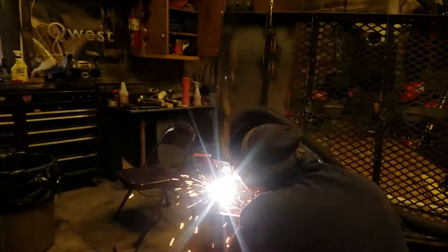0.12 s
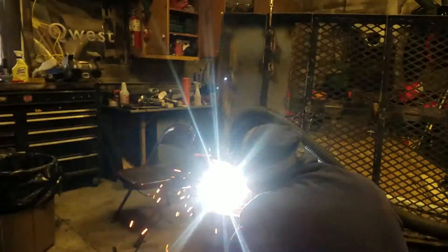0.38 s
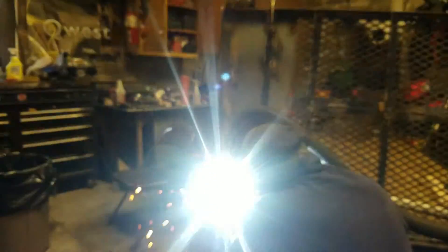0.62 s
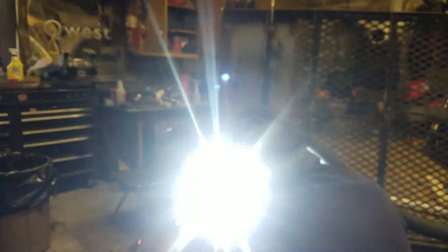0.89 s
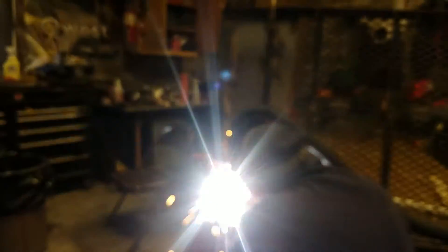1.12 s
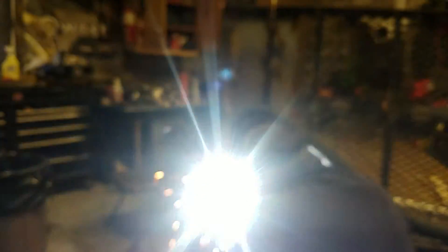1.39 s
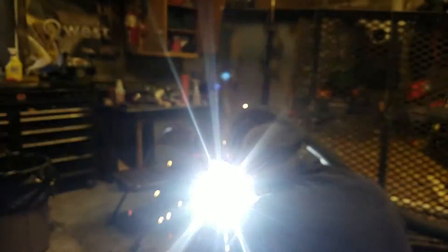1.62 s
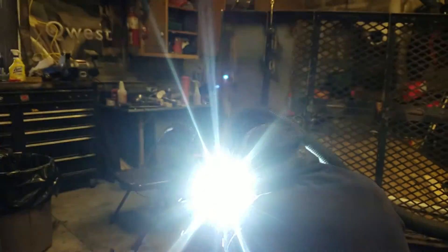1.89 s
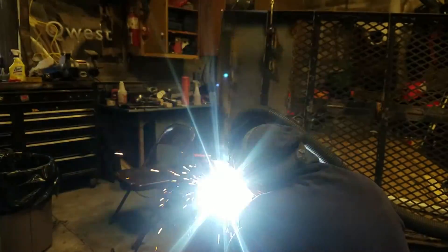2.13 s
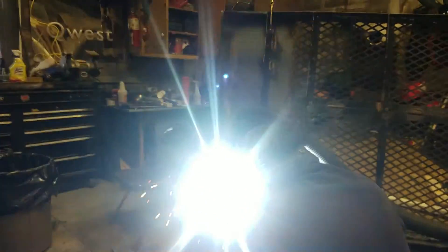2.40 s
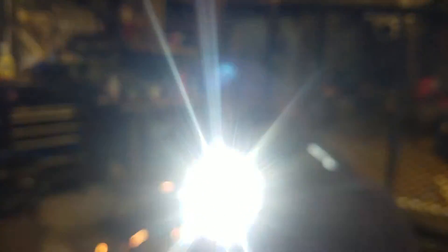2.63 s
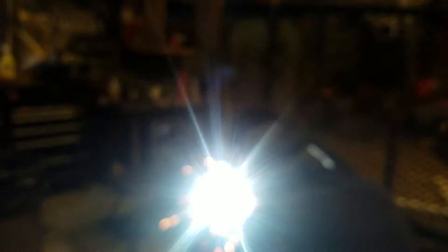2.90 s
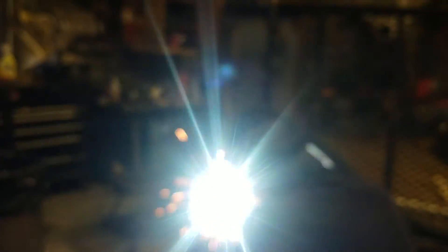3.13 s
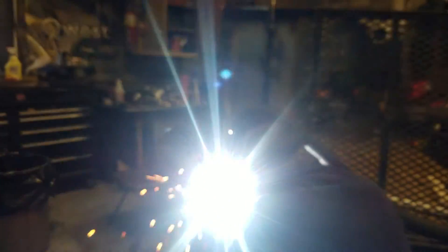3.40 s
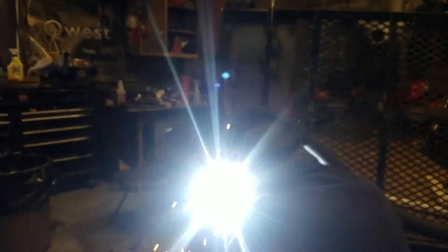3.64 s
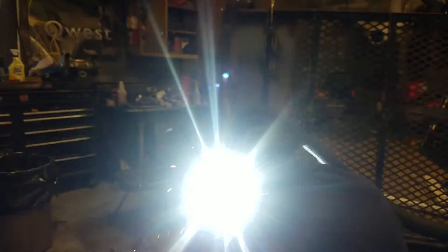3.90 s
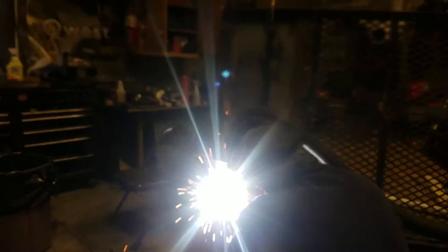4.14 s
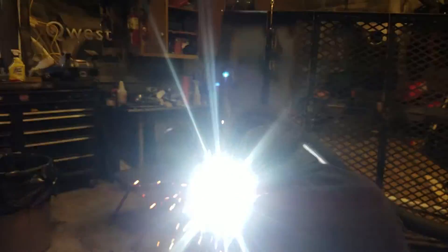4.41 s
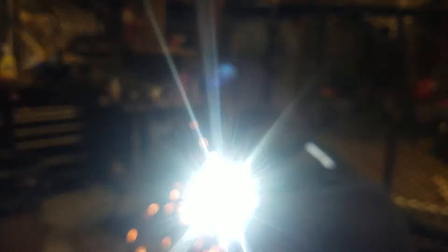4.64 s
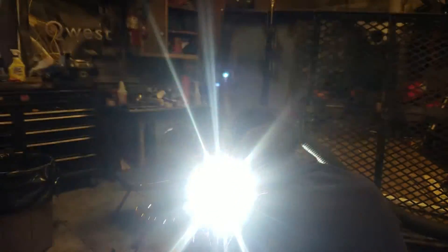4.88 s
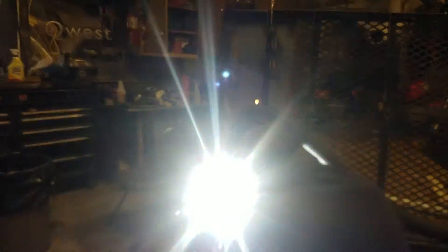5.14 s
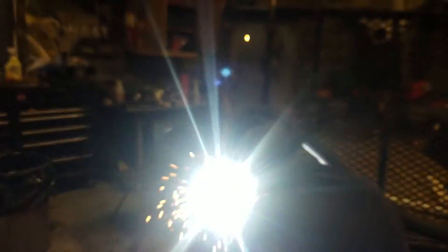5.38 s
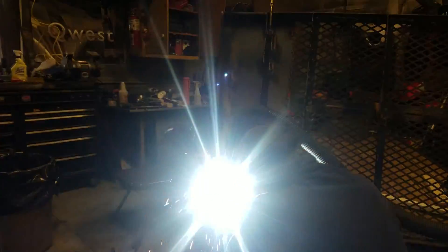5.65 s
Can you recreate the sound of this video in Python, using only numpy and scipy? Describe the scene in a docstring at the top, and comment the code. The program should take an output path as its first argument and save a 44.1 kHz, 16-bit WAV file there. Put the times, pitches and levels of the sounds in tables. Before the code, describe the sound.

A steady vacuum hum-whine, heavier in the right channel, runs from start to end under turbulent air noise. Over it a welding arc spits and hisses, bright and grainy, stuttering for split seconds again and again. The small hard room blurs the noise; a close stereo phone microphone evens the loudness. Late on, suction noise and the upper octave of the whine rise slightly.

```python
"""From the start a shop vacuum whines in a closed garage and a stick welding arc sizzles near a phone.
The rotor is a stack of wavering sines on shaft orders, the rush coloured noise, the arc dense noise bursts.
From 0.6 s on, short circuits dip the arc again and again; its lower hiss swells throughout.
The hose draw creeps up until 2.7 s, eases a little, then rises from 4.1 s to its most at 4.8 s:
rush and octave follow it, the shaft slows. Two ports colour the sound; gain control evens the level."""
import sys
import numpy as np
from scipy import signal
from scipy.fft import rfft, irfft
from scipy.io import wavfile
from scipy.ndimage import uniform_filter1d

SR = 44100
rng = np.random.default_rng(int(sys.argv[2]) if len(sys.argv) > 2 else 0)


def gain_from_db(level_db):
    """Convert decibel levels to linear amplitude factors (20 dB per decade)."""
    decades = np.asarray(level_db, float) / 20
    return 10 ** decades


def digitize_waveform(pressure):
    """Quantize a signal to 16-bit integers and store it at the path in sys.argv[1].

    Rows of a 2-D input are taken as channels; values are limited to [-1, 1].
    """
    field = np.atleast_2d(pressure).T
    bounded = np.clip(field, -1, 1)
    quanta = np.round(bounded * 32767).astype(np.int16)
    wavfile.write(sys.argv[1], SR, quanta)


N = 254456
T = np.arange(N) / SR


def walk(rate_hz):
    """Slow random drift: levels held 1 / rate_hz s, slewed by two moving means; standard deviation 1."""
    hold = int(SR / rate_hz)
    held = np.repeat(rng.standard_normal(N // hold + 1), hold)
    drift = uniform_filter1d(uniform_filter1d(held, hold), hold)[:N]
    return drift / drift.std()


# Draw of the hose, also played by air(). Each row: time in seconds, lift of the rush in dB.
HOSE_DRAW = [(0, 0), (2.7, 0.7), (4.1, .5), (4.8, 1.5), (5.77, 1.3)]
# Rotor tones. Each row: shaft order, mains ripples added, left rms level in dB, right rms level in dB,
# left's phase lead in radians.
ROTOR_TONES = [(1, 0, -21, -15.4, -.2), (2, 0, -26.9, -28.5, 1.9), (3, 0, -37, -33.2, -1.2),
               (4, 0, -42.3, -33.5, -1.8), (5, 0, -36.4, -56, .6), (6, 0, -45, -50.5, -.2),
               (8, 0, -51, -57, .1), (1, -1, -50, -44.5, -.1), (1, 1, -55, -48, .1), (2, 1, -52, -48.5, .3)]


def rotor():
    """Shaft orders waver in the air stream; load slows the shaft, mains torque ripple adds side tones."""
    shaft_hz, sag_hz_per_db, wander_hz = 335.8, .2, .05
    ripple_hz, octave_db_per_db = 120, 2.0
    gust_db = .75 * walk(22)
    draw_db = np.interp(T, *np.transpose(HOSE_DRAW))
    speed_hz = shaft_hz - sag_hz_per_db * draw_db + wander_hz * walk(2.055)
    turn = 2 * np.pi * np.cumsum(speed_hz) / SR
    out = np.zeros((2, N))
    for order, ripples, left_db, right_db, lead_rad in ROTOR_TONES:
        spread_rad = .9 * (order - 1) - .5 * (order - 1) ** 2
        # speed ripple: the two side tones stand in opposition
        spread_rad += np.pi * (ripples < 0)
        phase = order * turn + ripples * 2 * np.pi * ripple_hz * T + spread_rad
        waver_db = gust_db + .15 * order * walk(40)
        # side tones come and go
        waver_db = waver_db + 2.5 * abs(ripples) * walk(5)
        # the loaded octave grows faster than the rush
        waver_db = waver_db + (order == 2) * octave_db_per_db * draw_db
        peak = np.sqrt(2) * gain_from_db(waver_db) * gain_from_db([[left_db], [right_db]])
        out += peak * np.cos(phase + np.array([[lead_rad], [-lead_rad]]) / 2)
    return out


def garage(x, t60_s, echo_db, scatter_db):
    """Direct sound, fixed echoes at each port, and a wash from a source that never sits still."""
    t = np.arange(SR // 4) / SR
    fade = 1000. ** (-t / t60_s) * np.clip(t / 0.003 - 1, 0, 1)
    fade /= np.sqrt(np.sum(fade ** 2))
    paths = gain_from_db(echo_db) * fade * rng.standard_normal((2, len(t)))
    paths[:, 0] = 1
    # mirrored lead-in: the room already rings at the start
    lead_in = np.concatenate([x[:len(t)][::-1], x])
    heard = signal.fftconvolve(lead_in[None], paths, axes=1)[:, len(t):len(t) + N]
    # wash: source power through the same decay, unrelated at the two ports
    power = signal.fftconvolve(lead_in ** 2, fade ** 2)[len(t):len(t) + N]
    wash = gain_from_db(scatter_db) * np.sqrt(np.abs(power)) * rng.standard_normal((2, N))
    return (heard + wash) / np.sqrt(1 + gain_from_db(2 * echo_db) + gain_from_db(2 * scatter_db))


# Angled arrival and separate channels. Each row: frequency in Hz, left's phase lead in radians.
PORT_LEAD = [(0, 0), (300, -.2), (1500, 0), (2500, .1), (5000, 1.1), (5900, .4), (6500, 1.1), (8500, .5),
             (9000, -.5), (10300, -.7), (11000, 0), (13000, .5), (14500, 1.2), (16000, 1.8)]


def colour(x, gains, peaks):
    """Each port has its own gain curve and resonances; both share one minimum phase, offset by PORT_LEAD."""
    size = 8192
    hz = np.maximum(np.arange(size // 2 + 1) * SR / size, 1)
    gains = np.array(gains)
    db = np.array([np.interp(np.log(hz), np.log(gains[:, 0]), gains[:, c]) for c in (1, 2)])
    for centre_hz, width_hz, left_db, right_db in peaks:
        bell = 1 / (1 + (2 * (hz - centre_hz) / width_hz) ** 2)
        db += np.array([[left_db], [right_db]]) * bell
    # folded cepstrum yields the minimum phase
    cepstrum = irfft(np.log(gain_from_db(db.mean(0))))
    cepstrum[1:size // 2] *= 2
    cepstrum[size // 2 + 1:] = 0
    lead_rad = np.interp(hz, *np.transpose(PORT_LEAD))
    phase = rfft(cepstrum).imag + lead_rad * np.array([[.5], [-.5]])
    # rolled to hold what leads, then trimmed by as much
    advance = size // 8
    response = np.roll(irfft(gain_from_db(db) * np.exp(1j * phase)), advance, axis=1)
    return signal.fftconvolve(x, response, axes=1)[:, advance:advance + N]


# Rushing air at the ports. Each row: frequency in Hz, left gain in dB, right gain in dB.
AIR_COLOUR = [(30, -69, -72), (77, -72.5, -71.5), (109, -78, -75), (145, -69, -64.5), (257, -65.5, -62),
              (470, -66, -59.5), (820, -67.5, -67), (1200, -70, -71), (2300, -69, -68.5), (4700, -69, -66),
              (6400, -72, -68.5), (8700, -81.5, -99), (16100, -82, -72)]
# Garage resonances. Each row: centre in Hz, width in Hz, left boost in dB, right boost in dB.
GARAGE_PEAKS = [(335, 90, 6, 6), (640, 110, 4, 2), (890, 50, 2, 4), (1110, 70, 8, 2), (1290, 50, 4, 2),
                (1530, 150, 5, 2), (2140, 80, 6, 4)]
# Cavities around the ports; air() plays the first, arc() all.
# Each row: centre in Hz, width in Hz, left boost in dB, right boost in dB.
PORT_CAVITIES = [(3030, 120, 4, 3), (5520, 240, 8, 1), (5810, 170, 14, 1), (6150, 90, 5, 1),
                 (6850, 330, 9, 2), (10170, 290, 4, 1), (10850, 190, 2, 1.5), (13700, 240, .6, 3),
                 (14180, 190, .6, 3), (14650, 190, .6, 3)]


def air():
    """Turbulent rush: long bass waves are alike at both ports, the room scatters the rest."""
    split_hz = 420
    draw_db = np.interp(T, *np.transpose(HOSE_DRAW))
    # sqrt(SR / 2): unit noise power per Hz
    flow = gain_from_db(draw_db + 0.89 * walk(30)) * np.sqrt(SR / 2)
    bass = signal.lfilter(*signal.butter(2, split_hz, fs=SR), flow * rng.standard_normal(N))
    far = garage(flow * rng.standard_normal(N), t60_s=0.21, echo_db=14.0, scatter_db=6.0)
    far = signal.lfilter(*signal.butter(2, split_hz, "high", fs=SR), far)
    stray = .18 * flow * rng.standard_normal((2, N))
    # the exhaust housing breathes one broad note straight at both ports
    housing = signal.lfilter(*signal.iirpeak(2450, 9.0, fs=SR), flow * rng.standard_normal(N))
    rush = far + stray + 0.83 * bass + gain_from_db(1.0) * housing
    return colour(rush, AIR_COLOUR, GARAGE_PEAKS + PORT_CAVITIES[:1])


def sparks(rate_hz, spread_db, burst_s):
    """Noise bursts decay from random moments, a few far stronger than the rest; rms 1."""
    size_db = np.minimum(spread_db * rng.exponential(size=N), 13)
    starts = (rng.random(N) < rate_hz / SR) * gain_from_db(2 * size_db)
    power = signal.lfilter([1], [1, -np.exp(-1 / (burst_s * SR))], starts)
    x = np.sqrt(power) * rng.standard_normal(N)
    return x / x.std()


# Short circuits. Each row: centre in seconds, width at half depth in seconds, dip of the sizzle in dB.
SHORT_CIRCUITS = [(.645, 0.016, 6), (1.06, 0.031, 4.5), (1.122, 0.018, 1), (1.53, 0.061, 4.5),
                  (1.567, 0.027, 12), (1.672, 0.045, 11), (2.008, .04, 5), (2.642, 0.027, 4),
                  (2.682, 0.011, 6), (3.617, 0.042, 7.5), (3.676, 0.022, 11), (4.212, 0.038, 0.5),
                  (4.432, 0.11, 8.5), (4.817, 0.025, 12), (4.86, 0.071, 5.5), (5.243, .025, 9),
                  (5.573, 0.021, 10)]
# Bright sizzle. Each row: time in seconds, relative level in dB.
SIZZLE_LEVEL = [(0, -25.5), (4.5, -25.5), (4.72, -23.5), (5.0, -25.5), (5.77, -27)]
# Lower hiss. Each row: time in seconds, relative level in dB.
HISS_LEVEL = [(0, -26.5), (.25, -23.5), (.65, -27), (.9, -24.5), (1.17, -27), (1.43, -21), (1.68, -26),
              (2.02, -25), (2.25, -23.5), (2.5, -23), (2.9, -28.5), (3.36, -23.5), (3.7, -25.5),
              (4.1, -24.5), (4.3, -23.5), (4.72, -23.5), (5.12, -26.5), (5.5, -23), (5.77, -27)]
# Arc at the ports. Each row: frequency in Hz, left relative gain in dB, right relative gain in dB.
ARC_GAINS = [(790, -22, -23), (2120, -7.5, -10.5), (4880, 1, -1.5), (6550, -3.5, -12), (7400, 0, -16),
             (7800, -6.5, -14), (8760, -8.5, -54), (9270, -4.5, -11), (9720, 5, -3.5), (11500, 0, 6.5),
             (12500, 2.5, -1), (14000, -6.5, 6.5), (15500, 4.5, -3)]


def arc():
    """Plasma sputters: fine sparks make the sizzle, and the lower hiss swells with the gas from the flux."""
    split_hz = 8000
    # a molten drop bridges the gap and the arc falters
    dip_db = np.zeros(N)
    for centre_s, width_s, depth_db in SHORT_CIRCUITS:
        dip_db += depth_db * np.exp(-4 * np.log(2) * ((T - centre_s) / width_s) ** 2)
    flutter = gain_from_db(1.65 * walk(140))
    spit = sparks(rate_hz=1100, spread_db=2.0, burst_s=0.00023) + 0.78 * rng.standard_normal(N)
    sizzle_db = np.interp(T, *np.transpose(SIZZLE_LEVEL)) - dip_db
    sizzle = garage(flutter * spit * gain_from_db(sizzle_db), t60_s=.13, echo_db=-5.0, scatter_db=-4.0)
    # the hiss feels the dips less
    hiss_db = np.interp(T, *np.transpose(HISS_LEVEL)) - 0.77 * dip_db + 0.36 * walk(29.96)
    hiss = garage(flutter * spit * gain_from_db(hiss_db), t60_s=0.39, echo_db=-2.5, scatter_db=-1.0)
    heard = signal.sosfilt(signal.butter(4, split_hz, "high", fs=SR, output="sos"), sizzle)
    heard += signal.sosfilt(signal.butter(4, split_hz, fs=SR, output="sos"), hiss)
    return gain_from_db(5.0) * colour(heard, ARC_GAINS, PORT_CAVITIES)


def scene():
    """Vacuum and arc together."""
    return rotor() + air() + arc()


def roll_off(x):
    """The treble ends steeply here."""
    return signal.sosfilt(signal.butter(12, 16510, fs=SR, output="sos"), x)


def record(dry):
    """Shared gain control pulls the level toward a set point; peaks are rounded, both band ends cut."""
    set_db, pull, smooth_s = -14.6, .45, .01
    low_cut_hz, top_hz = 70, 15750
    power = np.mean(dry ** 2, axis=0)
    keep = np.exp(-1 / (smooth_s * SR))
    for _ in range(2):
        power = signal.lfilter([1 - keep], [1, -keep], power, zi=[keep * power.mean()])[0]
    gain = (gain_from_db(2 * set_db) / power) ** (pull / 2)
    held = np.tanh(1.122 * dry * gain) / 1.045
    held = signal.lfilter(*signal.butter(2, low_cut_hz, "high", fs=SR), held)
    below_top = np.arange(N // 2 + 1) * SR / N < top_hz
    mix = irfft(rfft(held) * below_top, N)
    return roll_off(mix)


dry = scene()
out = record(dry)
digitize_waveform(out)
```